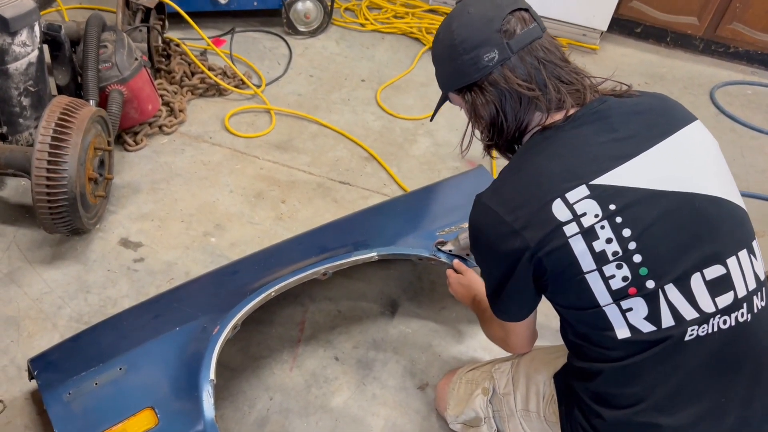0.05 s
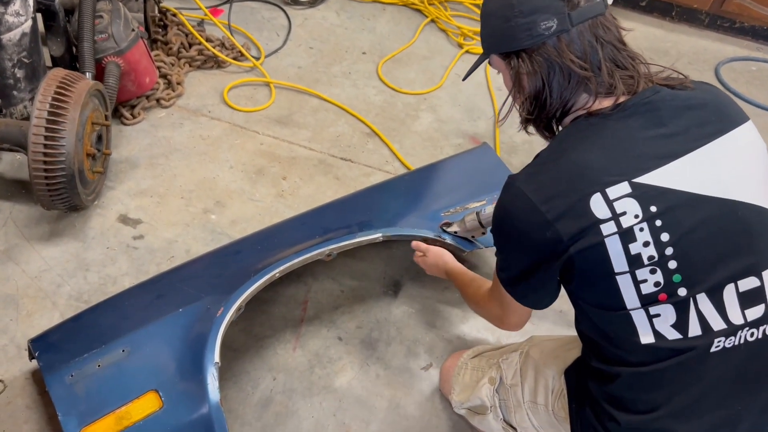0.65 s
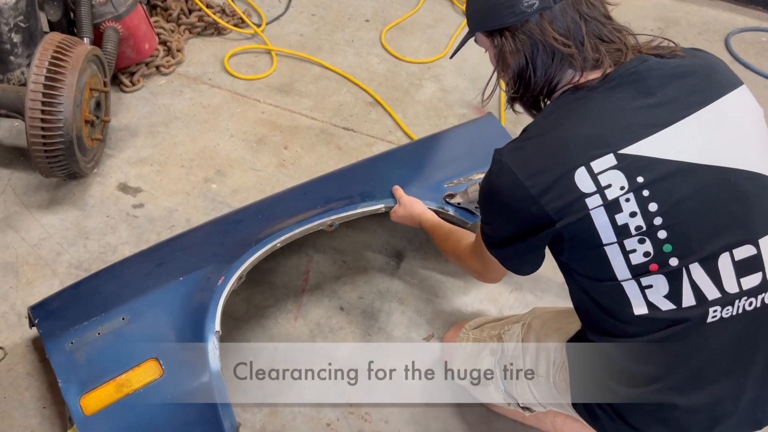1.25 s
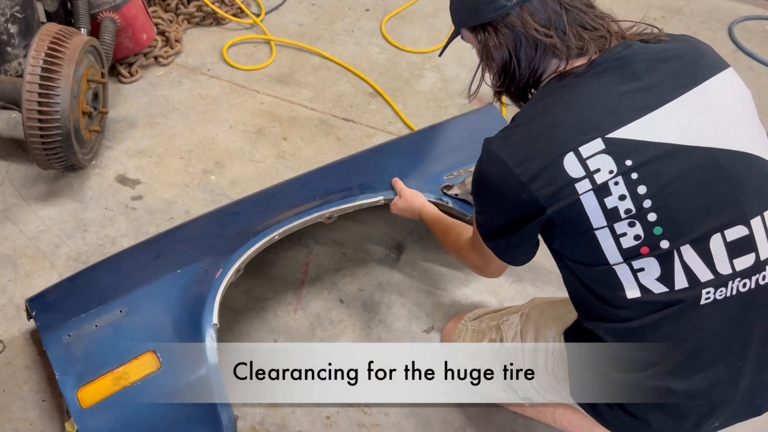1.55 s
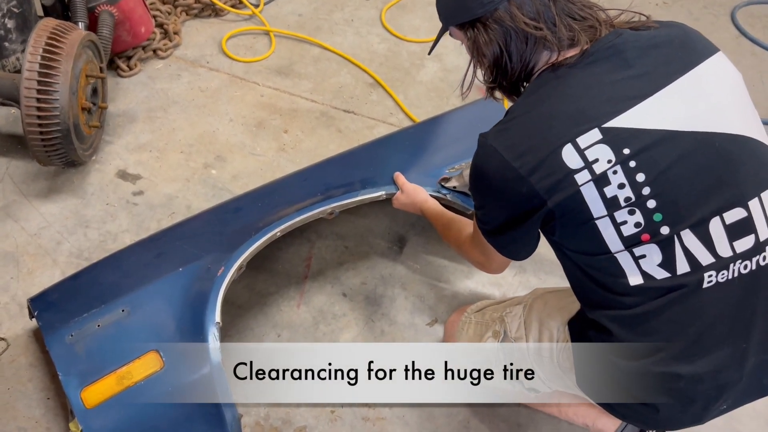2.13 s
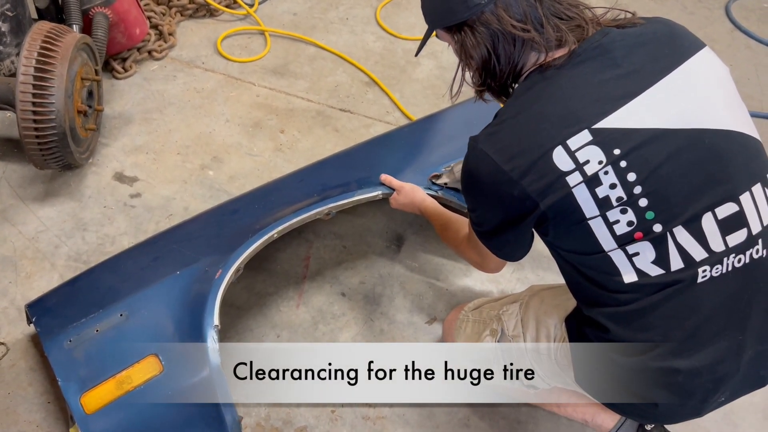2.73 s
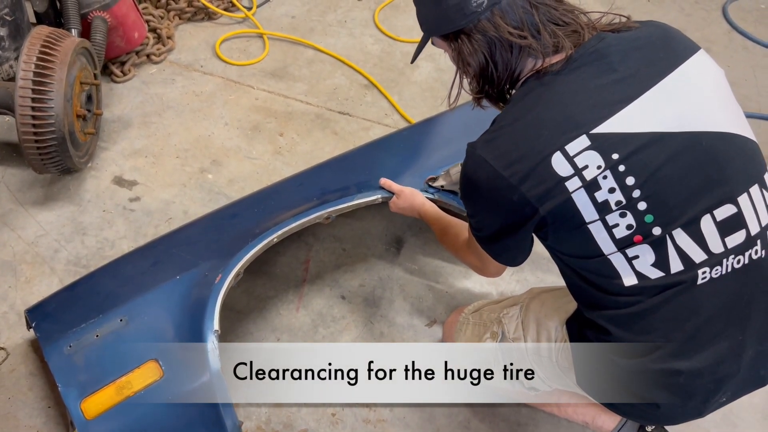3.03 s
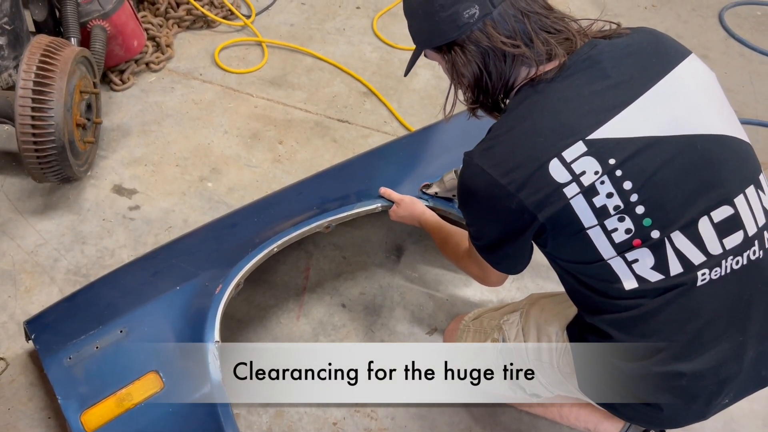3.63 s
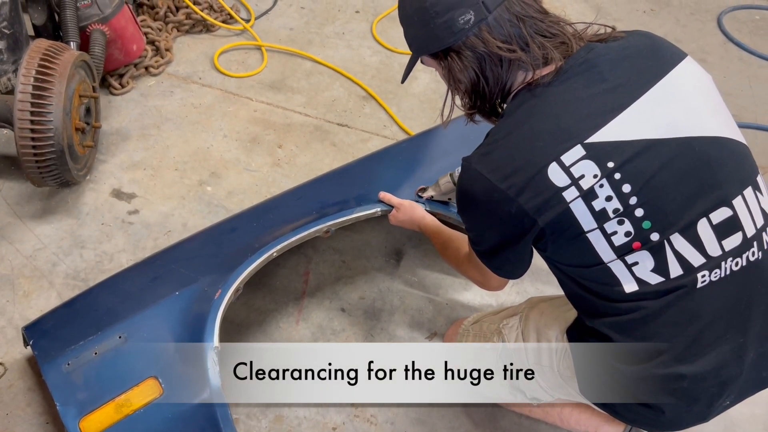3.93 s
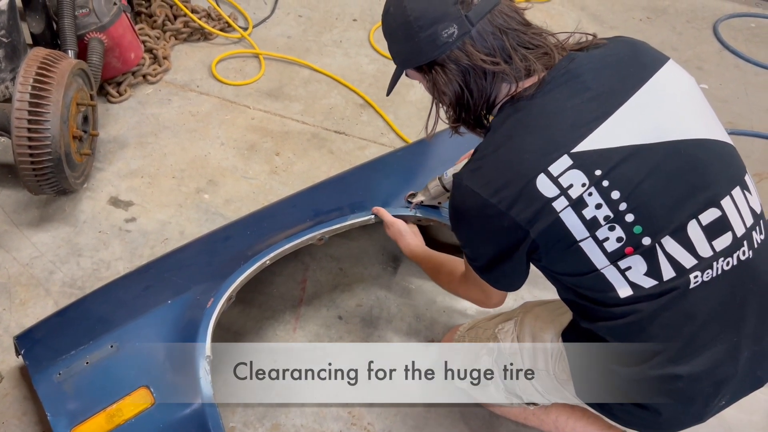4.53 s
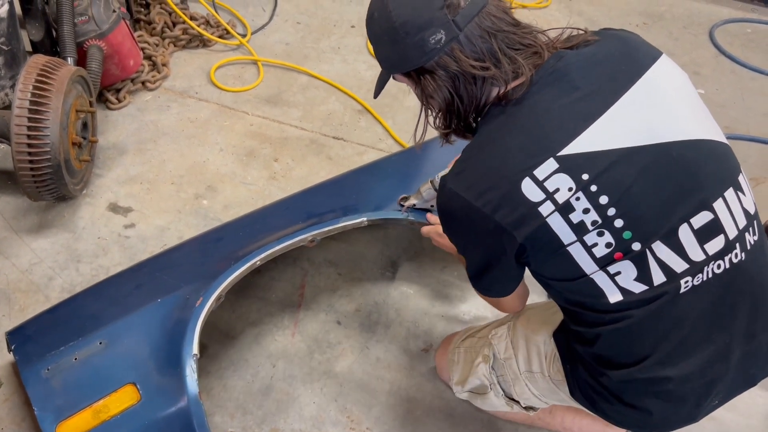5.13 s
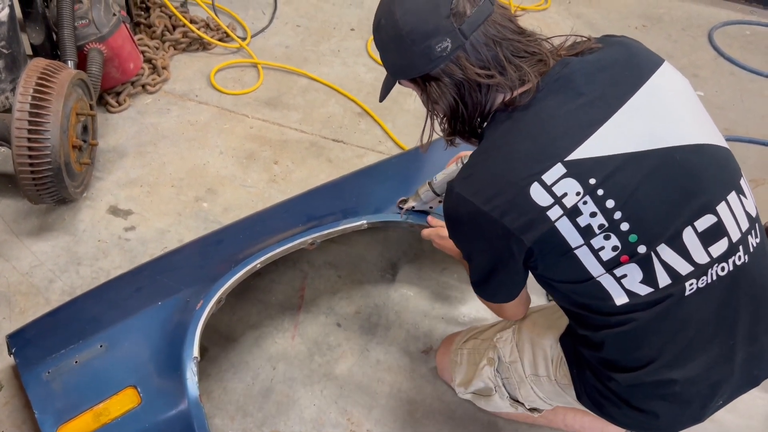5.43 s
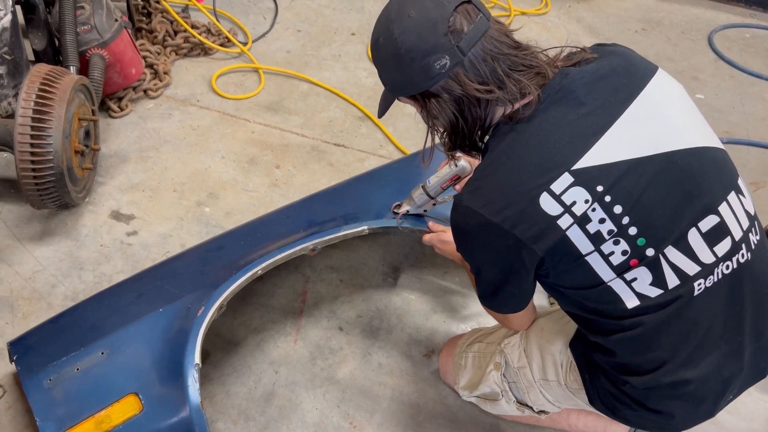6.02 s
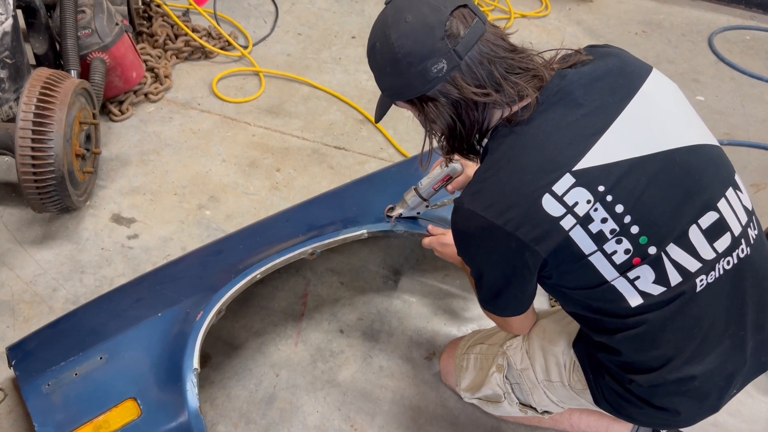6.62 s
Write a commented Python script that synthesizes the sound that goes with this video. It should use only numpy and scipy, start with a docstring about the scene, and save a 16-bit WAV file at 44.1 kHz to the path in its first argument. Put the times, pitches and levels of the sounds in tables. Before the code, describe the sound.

A metallic ring fades in a garage, leaving a short lull with a barely audible hiss. Then pneumatic shears spin up near the microphone and cut steadily into a steel fender. The motor's whine drops a little under load and wavers over a strong hiss of air, while the thin panel buzzes and rattles with the fast strokes, with scraping and occasional dull knocks.

```python
"""Air shears trim the wheel arch of a steel car fender on a garage floor.
The previous cut dies away as the sheet rings on; the air line hisses faintly over a low hum.
At 1.19 s the tool bumps the panel. At 1.28 s the trigger is pulled: the vane motor whines up,
then sags as the jaw bites. To the end, exhaust air rushes out, the blades scrape, and the
jaw's strokes drum and rattle the sheet, whose loose edge knocks against the tool."""
import sys
import numpy as np
from scipy import signal
from scipy.fft import rfft, irfft, next_fast_len
from scipy.io import wavfile
from scipy.ndimage import uniform_filter1d, map_coordinates

SR = 44100
rng = np.random.default_rng(int(sys.argv[2]) if len(sys.argv) > 2 else 0)


def int16_out(signal):
    """Quantize to a 16-bit WAV file."""
    q = np.round(np.clip(np.atleast_2d(signal).T, -1, 1) * 32767)
    wavfile.write(sys.argv[1], SR, q.astype(np.int16))


N = 302967
NUDGE_S, TRIGGER_S = 1.186, 1.277
CHIRP_S, CHIRP_WIDTH_S = 1.312, 0.054

# Motor running speed. Each row: time in seconds, vane puff rate in Hz.
VANE_RATE = [(1.38, 1410), (1.65, 1321), (1.83, 1275), (2.03, 1213), (2.2, 1188), (2.42, 1169),
             (2.63, 1166), (2.68, 1152), (2.8, 1151), (2.86, 1157), (2.93, 1128), (3.17, 1134),
             (3.25, 1126), (3.35, 1128), (3.55, 1118), (3.67, 1119), (3.88, 1113), (3.96, 1118),
             (4.15, 1117), (4.25, 1121), (4.38, 1118), (4.53, 1133), (4.63, 1139), (4.8, 1138),
             (5.12, 1141), (5.25, 1135), (5.45, 1132), (5.55, 1124), (5.75, 1119), (5.84, 1107),
             (6.13, 1107), (6.19, 1126), (6.27, 1113), (6.43, 1131), (6.52, 1104), (6.66, 1105),
             (6.75, 1131), (6.87, 1109)]
# Jaw load. Each row: time in seconds, bite from 0 to 1.
JAW_BITE = [(1.3, 0.06), (2.0, 0.53), (2.85, 0.76), (4.35, 0.81), (4.55, 0.05), (5.6, 0.62), (5.8, 0.75),
            (6.42, 0.55), (6.87, 0.76)]
# Whine harmonics 1-4 as the tool moves through standing waves. Each row: time in seconds, level in dB.
WHINE_1_DB = [(1.39, -34), (1.49, -44), (1.53, -24.5), (1.585, -35.5), (1.62, -21), (1.75, -23),
              (1.82, -41), (1.885, -19.5), (1.93, -23.5), (1.96, -37), (2.01, -19.5), (2.35, -22.5),
              (2.41, -26.5), (2.44, -40), (2.65, -42), (2.68, -29), (2.75, -31), (2.8, -40), (2.88, -25.5),
              (2.94, -36), (3.02, -42), (3.17, -38), (3.23, -27), (3.28, -30.5), (3.33, -43), (3.39, -40),
              (3.45, -26), (3.73, -28), (3.76, -40), (3.83, -31.5), (3.9, -44), (3.96, -29.5), (4.36, -26),
              (4.48, -27.5), (4.55, -47), (4.61, -27), (4.69, -51), (4.75, -36), (4.86, -31), (4.9, -48),
              (5.03, -36.5), (5.2, -32), (5.24, -37), (5.34, -46), (5.4, -33), (5.62, -26), (5.75, -28),
              (5.79, -42), (5.87, -31.5), (6.15, -32), (6.21, -26.5), (6.26, -34.5), (6.37, -26.5),
              (6.47, -31.5), (6.52, -39), (6.56, -30), (6.84, -31)]
WHINE_2_DB = [(1.39, -45), (1.64, -39), (1.73, -24.5), (1.93, -32.5), (2.02, -30.5), (2.6, -25),
              (2.65, -40), (3.13, -36), (3.36, -30), (3.41, -37), (3.85, -32), (3.96, -35.5), (4.24, -32.5),
              (4.34, -36), (4.44, -30), (4.8, -44), (4.91, -25.5), (5.07, -29), (5.14, -33), (5.21, -34),
              (5.42, -39.5), (5.5, -27.5), (5.69, -35.5), (5.87, -28), (6.13, -27), (6.22, -32), (6.3, -29),
              (6.5, -32), (6.62, -30.5), (6.78, -30), (6.84, -33)]
WHINE_3_DB = [(1.39, -43), (2.41, -41.5), (2.61, -31.5), (2.67, -42), (3.13, -38), (3.26, -33), (3.68, -33),
              (3.86, -30.5), (4.01, -33.5), (4.17, -32), (4.3, -38.5), (4.44, -31.5), (4.5, -43.5),
              (6.84, -42.5)]
WHINE_4_DB = [(1.39, -50), (1.7, -38), (1.95, -48), (2.3, -47), (2.62, -40), (2.69, -38), (3.1, -35.5),
              (3.45, -39.5), (4.4, -36.5), (4.7, -43.5), (4.9, -40), (5.3, -37.5), (5.54, -41), (5.9, -49),
              (6.3, -38), (6.84, -40.5)]
# Whine harmonics 1-4. Each row: rasp base level in dB, start chirp in dB, left over right in dB.
WHINE_VOICING = [(-42.5, -23, 3), (-37.5, -32, -2.5), (-44.5, -50, 0), (-43.5, -60, 10)]
# Rasp sidebands. Each row: offset in stroke rates, gain in dB.
RASP_SIDEBANDS = [(-2, -4), (-1, -1), (1, -3), (2, -16)]
# Weak whine partials. Each row: multiple of the vane rate, level in dB.
WEAK_PARTIALS = [(2.75, -55), (3.501, -46), (3.75, -59), (5, -48), (6, -53)]

# Sheet response, main and upper modes. Each row: frequency in Hz, gain in dB.
PANEL_SPECTRUM = [(30, -54), (100, -25.5), (140, -19.5), (175, -7.5), (210, -4.5), (250, -2.5), (290, 2),
                  (350, -3), (385, -4.5), (420, -16), (470, -44), (700, -51), (1500, -120)]
UPPER_MODE_SPECTRUM = [(400, -6.5), (455, -8), (490, 0), (525, 0), (560, 0), (595, 2), (640, -13),
                       (720, -16)]
# Buzz of the upper modes. Each row: time in seconds, level in dB.
BUZZ_DB = [(1.32, -53), (1.43, -36), (2.0, -36.5), (2.21, -32), (2.53, -42), (3.28, -41), (3.7, -41.5),
           (4.4, -38), (4.8, -34.5), (5.21, -34.5), (5.38, -44), (5.54, -34), (5.91, -42.5), (6.17, -37.5),
           (6.87, -43)]
# The sheet flexes. Each row: centre and width in seconds, swell in dB, lead mode in Hz, added looseness.
FLEXES = [(1.488, 0.15, 7, 345.5, 0.03), (1.637, 0.08, 0, 325.6, 0), (1.787, 0.11, 3.5, 299.2, 0.02),
          (2.021, 0.14, 7, 266.5, 0.52), (2.251, 0.15, 5.5, 328.6, 0.28), (2.491, 0.4, 1, 291.8, 0.06),
          (2.963, 0.064, 6, 280, 0.2), (3.352, 0.24, 1.5, 248, 0.45), (3.594, 0.049, 5.5, 273, 0.05),
          (4.1, 0.51, -0.5, 379.4, 0.12), (4.427, 0.11, 7, 270.3, 0.37), (4.835, 0.21, 2.5, 251.7, 0.04),
          (4.99, .14, 1, 366.1, 0.37), (5.286, 0.19, -2, 214, 0.01), (5.512, 0.149, 2.5, 209.7, 0),
          (5.668, 0.12, 4, 298.4, 0.38), (5.782, 0.09, 0.5, 342.6, 0.18), (5.93, 0.12, -2, 333, 0.2),
          (6.17, 0.13, 6, 285.7, 0.42), (6.32, 0.098, 3, 319.9, 0.4), (6.618, 0.067, 5.5, 181.8, 0.3),
          (6.775, .1, -2, 281.4, 0.23)]
# Sheet and tool modes sing. Each row: centre and width in seconds, mode in Hz, level in dB.
MODE_FLARES = [(1.79, 0.18, 4540, -37), (2.12, 0.23, 4190, -38.5), (2.5, 0.33, 5260, -41),
               (1.75, 0.5, 3245, -41), (1.65, .09, 289, -32.5), (1.66, .25, 202, -46),
               (2.496, 0.16, 292, -34.5), (2.47, 0.22, 710, -43), (3.25, 0.36, 388, -41),
               (3.42, 0.16, 351, -38.5), (3.5, 0.18, 246, -42), (3.7, 0.46, 489, -37.5),
               (4.22, .3, 489, -40), (4.1, 0.47, 558, -39.5), (4.0, 0.6, 349, -37), (4.22, .42, 385, -37),
               (4.8, .26, 249, -34.5), (2.24, 0.23, 360, -43), (2.84, 0.28, 326, -48),
               (1.626, 0.068, 331, -29.5), (4.3, 0.31, 245, -43), (4.87, 0.7, 178, -43.5),
               (4.92, 0.47, 820, -38), (4.95, 0.12, 391, -40), (5.522, 0.2, 176, -41),
               (5.3, 0.18, 213, -42), (4.7, .16, 490, -40), (5.8, 0.21, 488, -47), (5.88, 0.27, 346, -42),
               (6.02, 0.21, 190, -46), (5.933, 0.24, 1384, -37.5), (6.01, 0.76, 3252, -42),
               (6.659, 0.086, 311, -34)]
# The loose edge hits the tool. Each row: start in seconds, relative level in dB, ring in Hz.
EDGE_KNOCKS = [(1.489, -16, 340), (1.554, -20, 343), (1.622, -21, 336), (2.94, -18, 274), (2.958, -13, 275),
               (3.016, -14, 306), (3.047, -16.5, 310), (4.414, -17, 275), (4.44, -22, 350),
               (4.82, -30, 242), (5.773, -26, 353), (6.164, -18, 283.6), (6.208, -18, 284),
               (6.302, -14, 315), (6.604, -24, 169), (6.639, -24, 293)]

# Exhaust rush and hiss. Each row: frequency in Hz, gain in dB.
RUSH_SPECTRUM = [(600, -53), (1000, -10.5), (1400, 0), (1800, 1), (2600, 1), (3300, 0), (4300, -5.5),
                 (5500, -19), (8000, -43)]
HISS_SPECTRUM = [(2500, -16.5), (4000, 1.5), (5200, 4), (6500, 0), (8000, 0.65), (9200, -0.5),
                 (11000, -3.5), (12000, 1.7), (13500, 0.5), (14600, -3.5), (15700, -3.5)]
# Housing modes. Each row: centre in Hz, width in Hz, gain in dB.
HOUSING_MODES = [(1372, 38, 1.5), (2560, 49, -3.5), (2760, 53, -8), (3110, 70, -9),
                 (3890, 66, -8), (4200, 43, -5), (5200, 58, -13), (5640, 50, -7)]
# Blades on steel. Each row: frequency in Hz, gain in dB.
SCRAPE_SPECTRUM = [(50, -34), (100, -34), (140, -12), (250, -9), (420, -2.5), (550, -0.5), (800, 2.5),
                   (1000, 4.5), (1300, -6), (1700, -32), (3000, -52), (5000, -120)]
# The blades catch. Each row: centre and width in seconds, rise in dB.
BLADE_GRINDS = [(1.285, 0.044, 12.5), (4.51, 0.06, 3), (4.846, 0.13, 6), (5.075, 0.14, 2.5),
                (6.517, 0.35, 5), (6.87, 0.06, 8)]
# Tool body shake. Each row: frequency in Hz, gain in dB.
THROB_SPECTRUM = [(20, -35), (35, -17), (55, -13), (72, 7),
                  (110, -6.0), (150, -18), (220, -21), (500, -120)]
# Shake strength. Each row: time in seconds, level in dB.
THROB_DB = [(1.34, -50), (2.13, -48.5), (2.68, -61.5), (5.16, -54), (5.4, -62), (6.2, -57.5), (6.64, -50.5),
            (6.7, -60), (6.87, -54)]

# Tail of the previous cut. Each row: frequency in Hz, gain in dB.
TAIL_SPECTRUM = [(40, -24), (70, -12), (120, -27), (200, -6), (310, -2), (420, -9), (490, -9), (900, -4),
                 (1400, -9), (2200, -11.5), (5100, -18), (8400, -28), (12000, -28), (15700, -40)]
# Sheet and garage ring on. Each row: frequency in Hz, relative level in dB, t60 in seconds.
TAIL_MODES = [(275, -33.5, 0.79), (343, -33, .42), (407, -41, 0.41), (592, -41, 0.87), (962, -32, .35),
              (1180, -40, .38), (2252, -40, .35)]
# Quiet garage and leaking line. Each row: frequency in Hz, gain in dB.
LEAK_SPECTRUM = [(25, -18), (60, 1), (100, -4), (180, -6), (400, -11), (700, -16), (1200, -17), (4500, -24),
                 (7000, -23), (9000, -23), (12500, -18), (15700, -29)]
# Tool cavities. Each row: centre in Hz, width in Hz, gain in dB.
CAVITY_MODES = [(1410, 50, -9), (1630, 77, -1), (2140, 90, 2), (2330, 90, -4), (2700, 130, -4),
                (2840, 72, 1), (3280, 70, -7), (4000, 200, -4), (4250, 190, -2), (4680, 220, -7),
                (5100, 130, -4), (5930, 240, -7), (7700, 200, -14)]
# Leak and hum fades. Each row: time in seconds, gain in dB.
LEAK_FADE_DB = [(.95, 2.5), (1.25, -2.5)]
HUM_FADE_DB = [(0, 7), (.3, 6), (.5, 8), (.9, -9), (1.2, 0)]
# Garage decay. Each row: frequency in Hz, t60 in seconds.
GARAGE_T60_S = [(100, 0.089), (300, 0.67), (600, 0.66), (1000, 0.48), (4000, 0.42), (12000, 0.41)]
# Left-right likeness of noise. Each row: frequency in Hz, correlation (clipped to +-1 in use).
STEREO_CORRELATION = [(100, 1), (300, 0.95), (700, 0.32), (1400, 0.42), (3000, 0.16), (6000, 0.11),
                      (8100, 0.62), (9000, -0.57), (9500, -1.18), (10900, -1.2), (11400, 0.44),
                      (12200, 0.013), (13000, 0.92), (14200, 0.97), (15400, 0.027)]


def shears(open_s=0.032, engage_s=0.028, spin_up_s=.023, cruise_hz=1135, gear_ratio=32):
    """The valve opens; the motor spins up and drives the jaw through a reduction gear."""
    since_s = np.maximum(clock() - TRIGGER_S, 0)
    vane_hz = curve(VANE_RATE)
    bite = curve(JAW_BITE)
    drive_db = 20 * np.log10(vane_hz / cruise_hz)  # speed stands for air pressure
    spin = 1 - np.exp(-since_s / spin_up_s)
    puffs = np.cumsum(spin * vane_hz) / SR
    stroke_hz, strokes = vane_hz / gear_ratio, puffs / gear_ratio
    valve = np.minimum(since_s / open_s, 1)
    engaged = np.minimum(since_s / engage_s, 1)
    air = exhaust(puffs, strokes, drive_db)
    blades = scrape(strokes, bite) * amp([[.9], [-.9]])
    cut = fender(stroke_hz, strokes, bite) + flares(stroke_hz, strokes) + throb(stroke_hz, strokes)
    return valve * (air + blades) + engaged * cut + whine(puffs, strokes, bite, spin, drive_db)


def whine(puffs, strokes, bite, spin, drive_db, drag_rad=0.18, seal_s=.05, room_db=-4.5, skew_db=-7):
    """Vanes chop the exhaust into a tone; each bite slows them briefly and adds a rasp."""
    sputter = 11 * np.exp(-np.maximum(clock() - TRIGGER_S, 0) / seal_s)  # until the vanes seal
    roughness = 1 + sputter + 0.59 * np.maximum(drive_db, 0)
    jitter_rad = 0.08 * roughness * (1.7 * wobble(70) + 0.58 * wobble(300))
    jaw_rad = 2 * np.pi * strokes
    vane_rad = 2 * np.pi * puffs + drag_rad * bite * np.sin(jaw_rad) + jitter_rad
    levels_db = map(curve, (WHINE_1_DB, WHINE_2_DB, WHINE_3_DB, WHINE_4_DB))
    chirp = swell(CHIRP_S, CHIRP_WIDTH_S)
    direct = np.zeros((2, N))
    radiated, skew = np.zeros((2, N))
    for k, (db, (rasp_db, chirp_db, pan_db)) in enumerate(zip(levels_db, WHINE_VOICING), 1):
        flutter = unit(amp(wobble(45)))
        partial = flutter * np.sin(k * vane_rad)
        gain = amp(db + 0.58 * wobble(22)) + chirp * amp(chirp_db + 2.5 * wobble(220))
        rasp = np.zeros(N)
        for offset, side_db in RASP_SIDEBANDS:
            side_gain = bite * amp(rasp_db + side_db + 3 * wobble(8))
            rasp += side_gain * np.sin(k * vane_rad + round(offset) * jaw_rad + 1.67 * wobble(5))
        pan = amp([[pan_db / 2], [-pan_db / 2]])
        direct += np.sqrt(2) * (gain * partial + rasp) * pan / pan.mean()
        # A partial swells and fades at one spot; its power in the room stays even.
        even_gain = spin ** 4 * np.sqrt(np.abs(uniform_filter1d(2 * amp(db) ** 2, size=SR)))
        radiated += even_gain * partial + spin * rasp
        skew += even_gain * flutter * np.cos(k * vane_rad + .5 * wobble(3.04))  # left-right phase shift
    for k, db in WEAK_PARTIALS:
        gain = spin ** 4 * amp(db + .3 * drive_db + 2.7 * wobble(14))
        drift_rad = (.5 + .8 * np.abs(drive_db)) * wobble(55)
        partial = gain * np.sqrt(2) * np.sin(k * vane_rad + drift_rad)
        direct += partial
        radiated += partial
    return spin ** 2 * direct + amp(room_db) * reverb(radiated) + amp(skew_db) * np.array([skew, -skew])


def exhaust(puffs, strokes, drive_db, rush_base_db=-31, hiss_base_db=-29, ring_gain_db=-8):
    """Spent air leaves in puffs, swells with pressure and once a stroke, and rings the housing."""
    waver_db = 0.78 * wobble(12)
    rush_db = rush_base_db + 2.27 * drive_db + waver_db
    hiss_db = hiss_base_db + 1.6 * drive_db + waver_db
    chop = unit(1 + 0.0067 * np.sin(2 * np.pi * puffs))
    pulsing = chop * per_stroke(strokes, depth=0.11, scatter_db=0.84)
    ring = amp(rush_db + ring_gain_db) * resonant_noise(HOUSING_MODES)
    rush = amp(rush_db) * reflections(noise(RUSH_SPECTRUM), strength=0.11)
    hiss = amp(hiss_db) * reflections(noise(HISS_SPECTRUM), strength=0.082)
    return pulsing * (rush + hiss + ring)


def fender(stroke_hz, strokes, bite, base_db=-35, rattle_db=-3, boom_db=-9, room_db=-13):
    """The jaw drums the sheet; each flex swells it, favours one mode and may rattle."""
    swells = np.array([swell(s, width_s) for s, width_s, *_ in FLEXES])
    _, _, swell_db, mode_hz, looseness = np.transpose(FLEXES)
    gain = amp(base_db + swell_db @ swells)
    loose = np.clip(0.51 * (1 - bite) ** 2 + looseness @ swells, 0, 1)  # a firm bite steadies the sheet
    weight = swells ** 4 + 1e-30
    lead_hz = mode_hz @ weight / weight.sum(0)
    focus, half_width_hz = 4 * swells.max(0), 18

    def sheet(hz):
        return gain_at(PANEL_SPECTRUM, hz) * (1 + focus / (1 + ((hz - lead_hz) / half_width_hz) ** 2))

    low = stroke_tone(stroke_hz, strokes, range(3, 14), sheet, drift_rad=0.19 + 1.9 * loose)
    buzz = stroke_tone(stroke_hz, strokes, range(10, 21),
                       lambda hz: gain_at(UPPER_MODE_SPECTRUM, hz), drift_rad=1.72)
    drum = np.sqrt(1 - loose) * (gain * low + amp(curve(BUZZ_DB)) * buzz)
    lead_rad = 2 * np.pi * np.cumsum(lead_hz) / SR
    boom = unit(wobble(55) * np.sin(lead_rad) + wobble(55) * np.cos(lead_rad))
    clatter = amp(rattle_db) * noise(PANEL_SPECTRUM) + amp(boom_db) * boom
    rattle = gain * np.sqrt(loose) * clatter * per_stroke(strokes, depth=0.89, scatter_db=1.0)
    return drum + rattle + amp(room_db) * reverb(drum)


def scrape(strokes, bite, base_db=-32, clamp_db=-5.5):
    """The blades tear the sheet in short strokes; a firm bite keeps them from skating."""
    grind_db = sum(db * swell(s, width_s) for s, width_s, db in BLADE_GRINDS)
    level_db = base_db + clamp_db * bite + 1.35 * wobble(14) + grind_db
    return amp(level_db) * noise(SCRAPE_SPECTRUM) * per_stroke(strokes, depth=0.091, scatter_db=-0.5)


def flares(stroke_hz, strokes, rasp_per_khz=0.14):
    """As the cut moves on, modes pick out the nearest stroke harmonic; high ones rasp."""
    out = np.zeros(N)
    for s, width_s, hz, db in MODE_FLARES:
        order = round(hz / np.interp(s, clock(), stroke_hz))
        rasp = unit(1 + rasp_per_khz * hz / 1000 * wobble(70))
        envelope = amp(db + 1.4 * wobble(12)) * swell(s, width_s)
        out += envelope * rasp * np.sqrt(2) * stroke_harmonic(strokes, order, drift_rad=0.23)
    return out


def knocks(gain_db=-2, attack_s=0.0042, ring_t60_s=0.065, clatter_db=-9, clatter_t60_s=0.059):
    """The loose edge hits the tool: a brief ring under a dull clatter."""
    out = np.zeros((2, N + SR))
    t = np.arange(SR // 4) / SR
    attack = 1 - np.exp(-t / attack_s)
    clatter = noise(PANEL_SPECTRUM) + .5 * noise(SCRAPE_SPECTRUM)
    for s, db, hz in EDGE_KNOCKS:
        start = round(s * SR)
        ring = amp(-60 * t / ring_t60_s) * np.sin(2 * np.pi * hz * t)
        burst = amp(clatter_db - 60 * t / clatter_t60_s) * np.roll(clatter, -start, axis=1)[:, :len(t)]
        out[:, start:start + len(t)] += amp(db + gain_db) * attack * (ring + burst)
    return out[:, :N]


def throb(stroke_hz, strokes):
    """The tool body shakes at the first three stroke harmonics."""
    tone = stroke_tone(stroke_hz, strokes, range(1, 4),
                       lambda hz: gain_at(THROB_SPECTRUM, hz), drift_rad=0.51, waver_db=4)
    return amp(curve(THROB_DB) + wobble(4.3)) * (tone + 0.16 * noise(THROB_SPECTRUM))


def previous_cut(tail_db=-26.5, ring_gain_db=-4):
    """The previous cut dies away in the garage while the sheet rings on."""
    t = clock()
    ring = np.zeros(N)
    for hz, db, t60_s in TAIL_MODES:
        envelope = amp(db + ring_gain_db - 60 * t / t60_s) * (1 + 0.27 * wobble(30))
        ring += envelope * np.sin(2 * np.pi * hz * t)
    return amp(tail_db) * garage_decay(noise(TAIL_SPECTRUM)) + ring


def nudge(gain_db=-59, attack_s=0.009, t60_s=0.91):
    """The tool meets the panel with a soft bump."""
    t = np.maximum(clock() - NUDGE_S, 0)
    envelope = amp(gain_db - 60 * t / t60_s) * (1 - np.exp(-t / attack_s))
    return envelope * (noise(PANEL_SPECTRUM) + 0.39 * noise(SCRAPE_SPECTRUM))


def leak_and_hum(leak_db=-72, cavity_db=-68, hum_hz=293, hum_db=-74):
    """The air line leaks through the tool's cavities over a wavering low hum."""
    cavities = amp(cavity_db) * resonant_noise(CAVITY_MODES)
    hum_gain = amp(hum_db + curve(HUM_FADE_DB) + 4 * wobble(25))
    hum = hum_gain * np.sqrt(2) * np.sin(2 * np.pi * hum_hz * clock() + wobble(26))
    leak = amp(leak_db) * noise(LEAK_SPECTRUM)
    return amp(curve(LEAK_FADE_DB)) * (leak + cavities) + hum


def reflections(x, strength, spread_s=.009, count=9):
    """Close echoes off floor and fender comb the sound."""
    delays_s = spread_s * (0.1084 + rng.random((count, 1)))
    signs = np.sign(rng.standard_normal((count, 1)))
    ripple = lambda hz: np.sum(signs * np.cos(2 * np.pi * hz * delays_s), axis=0)
    return filtered(x, lambda hz: np.exp(strength * ripple(hz)))


def reverb(x):
    """Garage reverberation, opposite in phase left and right."""
    tail = garage_decay(rng.standard_normal(SR // 2))
    echo = signal.fftconvolve(x, tail / np.linalg.norm(tail))[:N]
    return np.array([echo, -echo])


def garage_decay(x):
    """Each frequency fades at the garage's t60."""
    hz, t, bins = signal.stft(x, SR, nperseg=256)
    decay = amp(-60 * t / log_interp(GARAGE_T60_S, hz)[:, None])
    return signal.istft(bins * decay, SR, nperseg=256)[1][..., :x.shape[-1]]


def stroke_tone(stroke_hz, strokes, orders, response, drift_rad, waver_db=3):
    """Stroke harmonics that sum to a soft knock per stroke; rms 1."""
    tone, power = np.zeros((2, N))
    for k in orders:
        gain = response(k * stroke_hz) * amp(waver_db * wobble(7))
        tone += gain * stroke_harmonic(strokes, k, drift_rad)
        power += gain ** 2 / 2
    return tone / np.sqrt(power + 1e-20)


def stroke_harmonic(strokes, k, drift_rad, dispersion_cycles=.035):
    """Drifting harmonic k; bending waves shift its phase by the order squared."""
    return np.sin(2 * np.pi * (k * strokes + dispersion_cycles * k * k) + drift_rad * wobble(10))


def per_stroke(strokes, depth, scatter_db):
    """Gain of rms 1 with one peak per stroke, each of random strength."""
    index = strokes.astype(int)
    strengths = amp(scatter_db * rng.standard_normal(index.max() + 1))
    return unit(np.exp(-depth * np.cos(2 * np.pi * strokes)) * strengths[index])


def noise(spectrum):
    """Coloured, partly correlated stereo noise; rms 1."""
    def mid_side_gains(hz):
        angle_rad = np.arccos(np.clip(log_interp(STEREO_CORRELATION, hz), -1, 1)) / 2
        return gain_at(spectrum, hz) * np.array([np.cos(angle_rad), np.sin(angle_rad)])

    mid, side = filtered(rng.standard_normal((2, N)), mid_side_gains)
    return unit(np.array([mid + side, mid - side]))


def resonant_noise(modes):
    """Stereo noise through parallel resonances; rms 1."""
    def response(hz):
        return np.sqrt(sum(amp(db) ** 2 / (1 + (2 * (hz - centre_hz) / width_hz) ** 2)
                           for centre_hz, width_hz, db in modes))

    return unit(filtered(rng.standard_normal((2, N)), response))


def filtered(x, response):
    """Zero-phase filter with gain response(hz)."""
    size = next_fast_len(N + SR // 2)
    return irfft(rfft(x, size) * response(np.fft.rfftfreq(size, 1 / SR)), size)[..., :N]


def wobble(rate_hz):
    """Smooth random curve through rate_hz knots a second."""
    knots = rng.standard_normal(int(N * rate_hz / SR) + 4)
    coarse = np.arange(0, N, 16)
    return np.interp(np.arange(N), coarse, map_coordinates(knots, [coarse * rate_hz / SR]))


def swell(centre_s, width_s):
    """Bell curve, width_s wide at half height."""
    return .5 ** ((2 * (clock() - centre_s) / width_s) ** 2)


def curve(rows):
    """(seconds, value) rows interpolated per sample."""
    return np.interp(clock(), *np.transpose(rows))


def gain_at(spectrum, hz):
    """Linear gain of a dB spectrum."""
    return amp(log_interp(spectrum, hz))


def log_interp(rows, hz):
    """(Hz, value) rows interpolated on a log axis."""
    row_hz, values = np.transpose(rows)
    return np.interp(np.log(hz + 1), np.log(row_hz + 1), values)


def clock():
    """Sample times in seconds."""
    return np.arange(N) / SR


def amp(db):
    """Decibels to gain."""
    return 10 ** (np.asarray(db) / 20)


def unit(x):
    """Scale to rms 1."""
    return x / np.sqrt(np.mean(x ** 2) + 1e-20)


def scene():
    """All sources in the garage, in stereo."""
    return shears() + knocks() + previous_cut() + nudge() + leak_and_hum()


def record(dry, low_hz=30, top_hz=15800, edge_hz=200):
    """Roll off the deepest bass and cut the top treble."""
    low_pass = lambda hz: np.clip((top_hz - hz) / edge_hz + .5, 0, 1)
    high_pass = lambda hz: 1 - 1 / (1 + (hz / low_hz) ** 4)
    return filtered(dry, lambda hz: low_pass(hz) * high_pass(hz))


dry = scene()
out = record(dry)
int16_out(out)
```